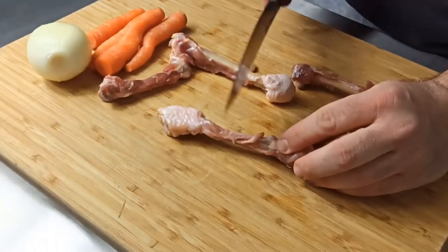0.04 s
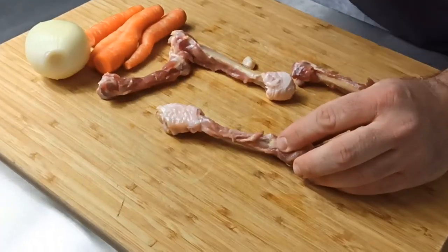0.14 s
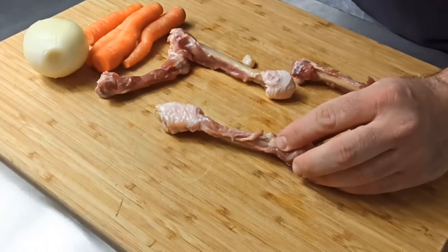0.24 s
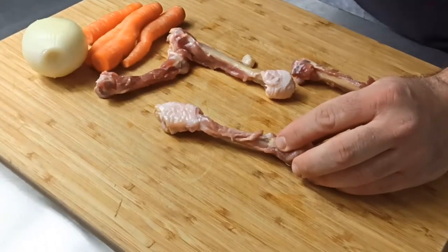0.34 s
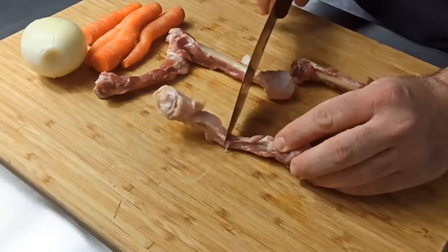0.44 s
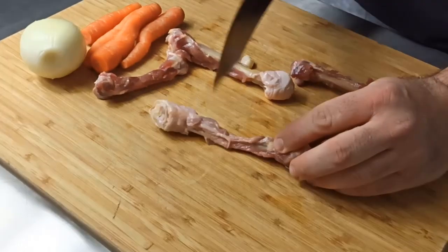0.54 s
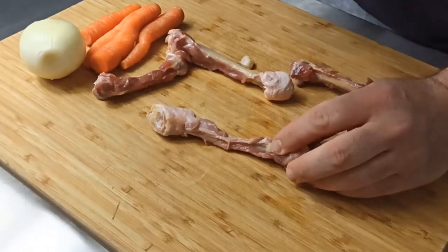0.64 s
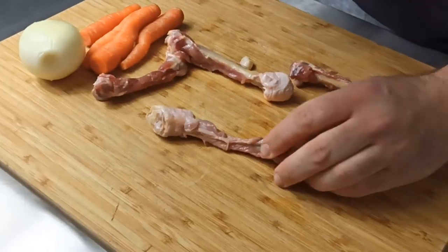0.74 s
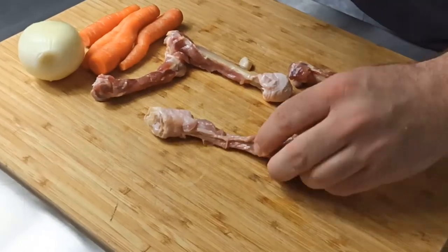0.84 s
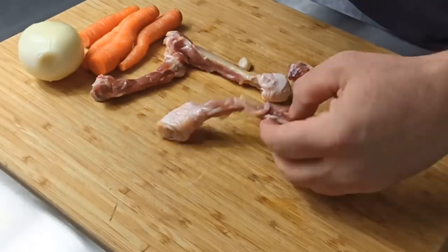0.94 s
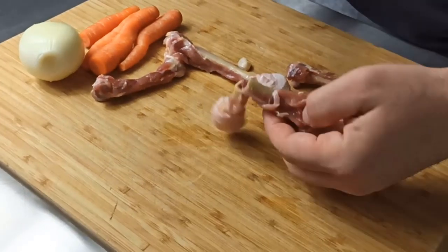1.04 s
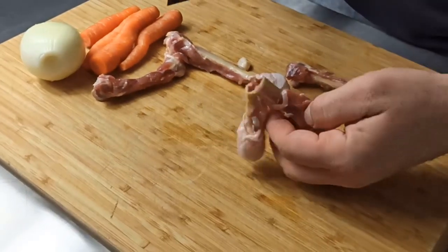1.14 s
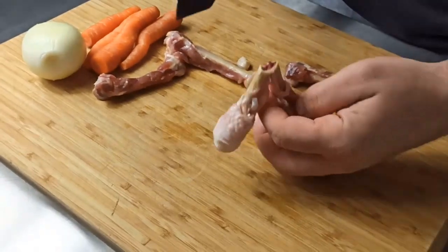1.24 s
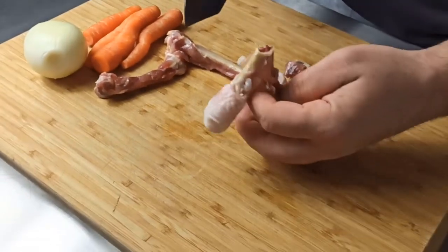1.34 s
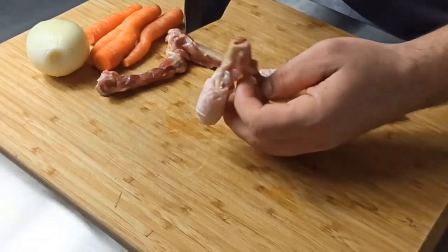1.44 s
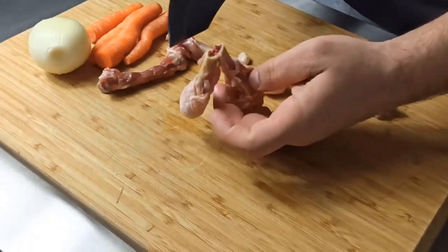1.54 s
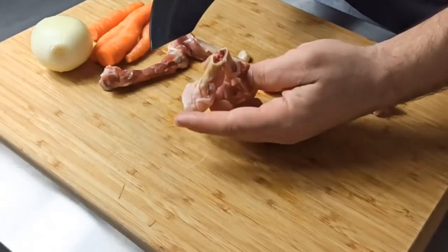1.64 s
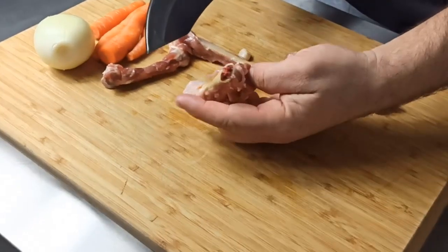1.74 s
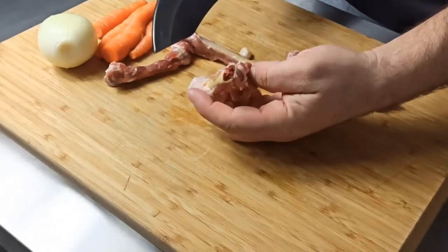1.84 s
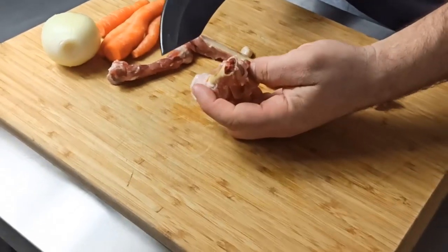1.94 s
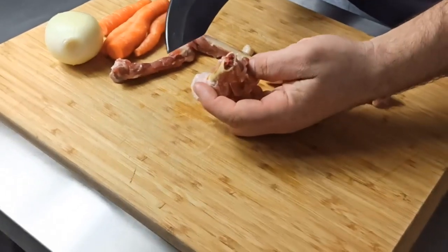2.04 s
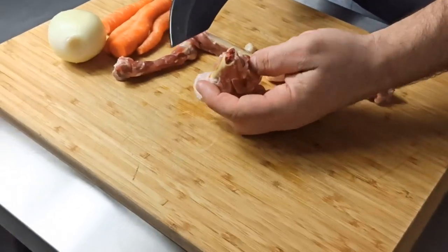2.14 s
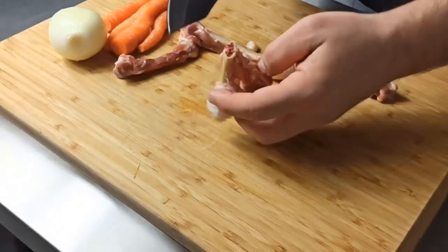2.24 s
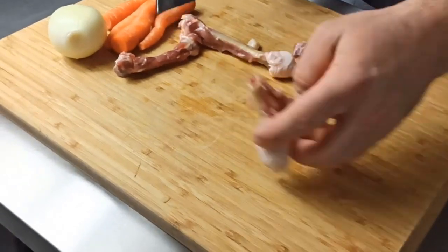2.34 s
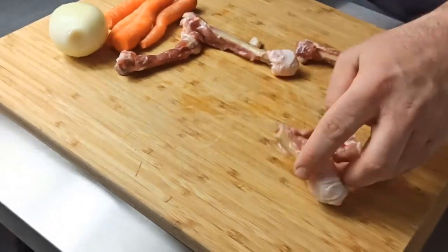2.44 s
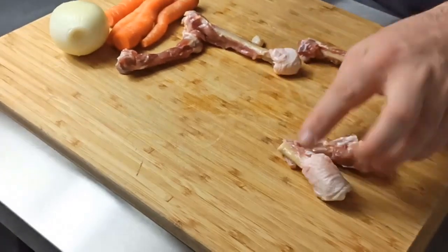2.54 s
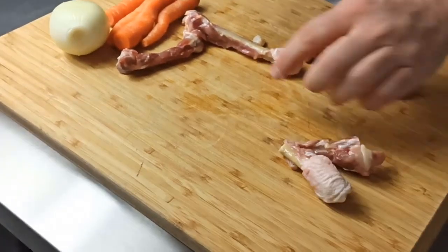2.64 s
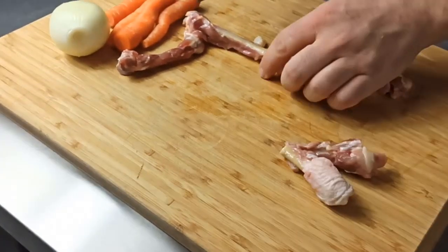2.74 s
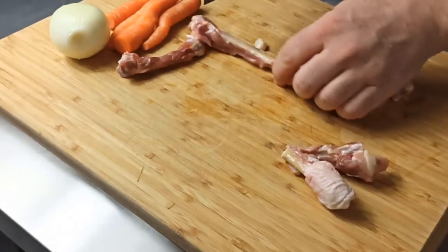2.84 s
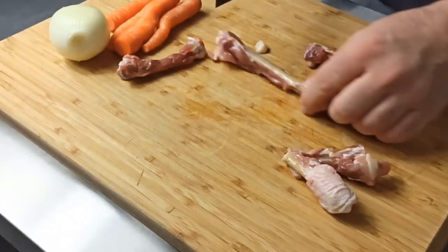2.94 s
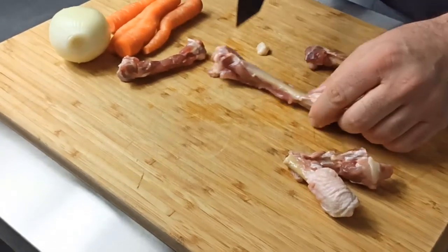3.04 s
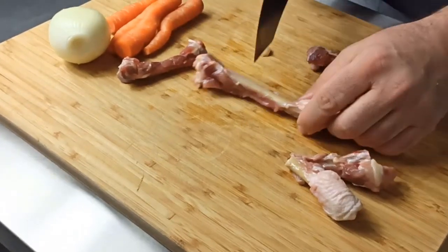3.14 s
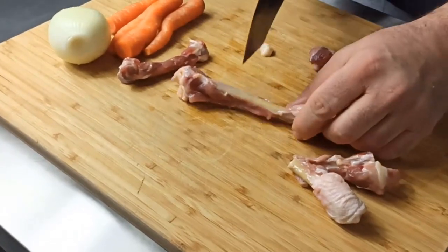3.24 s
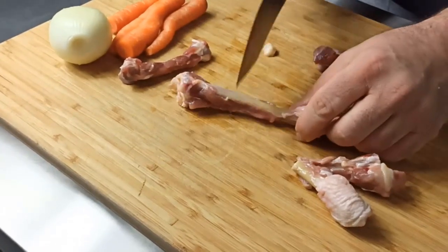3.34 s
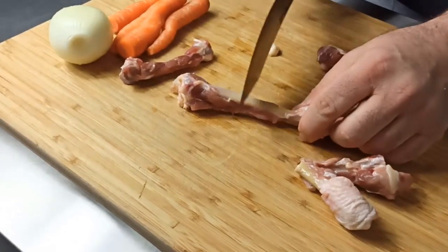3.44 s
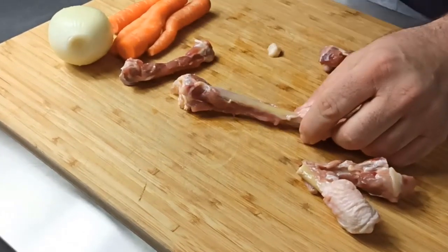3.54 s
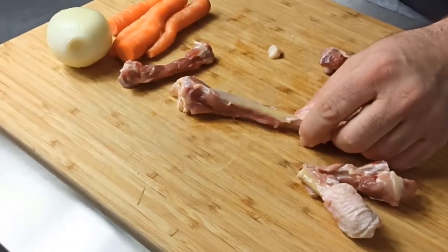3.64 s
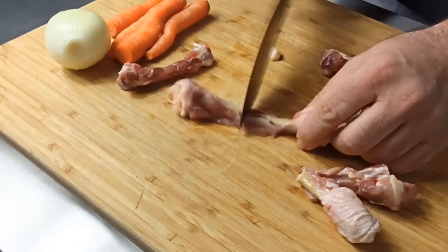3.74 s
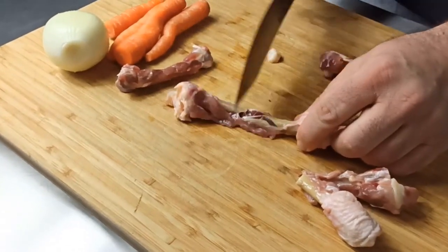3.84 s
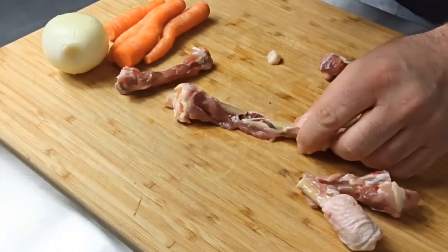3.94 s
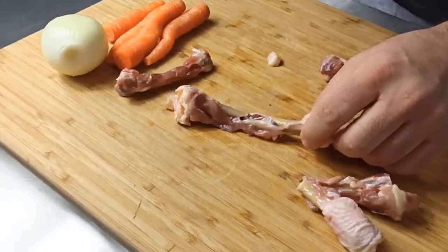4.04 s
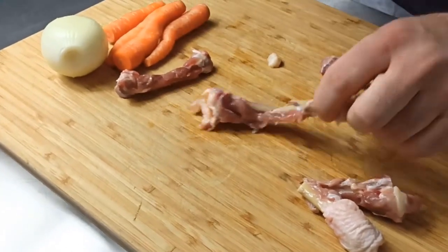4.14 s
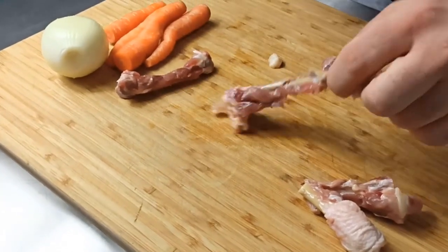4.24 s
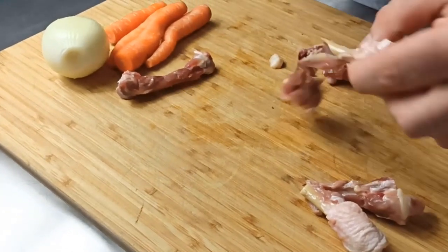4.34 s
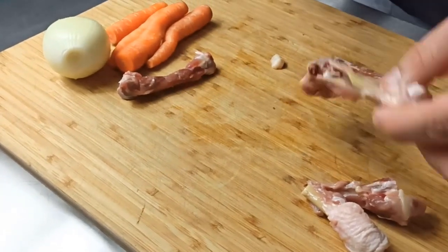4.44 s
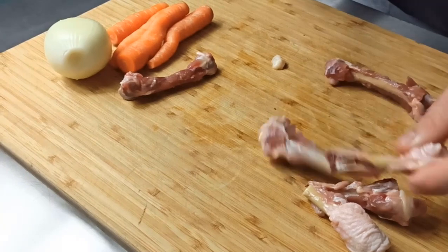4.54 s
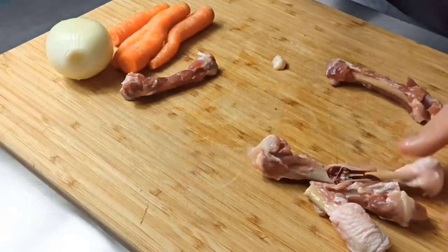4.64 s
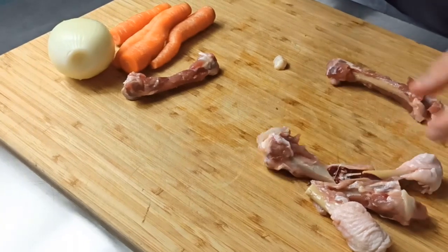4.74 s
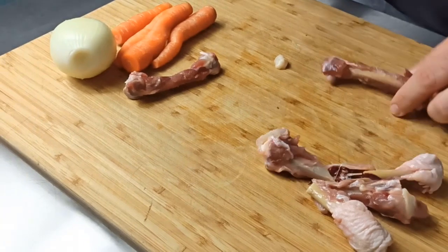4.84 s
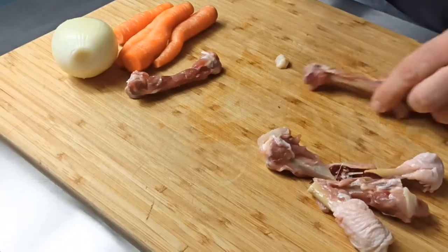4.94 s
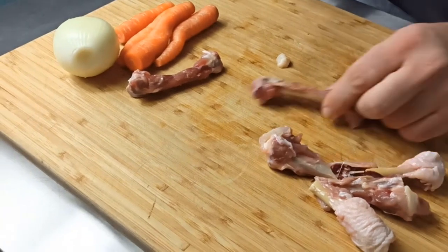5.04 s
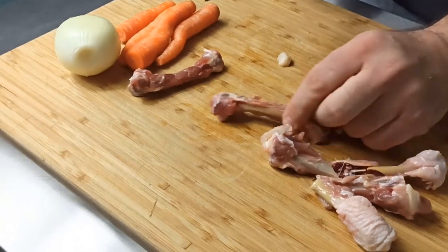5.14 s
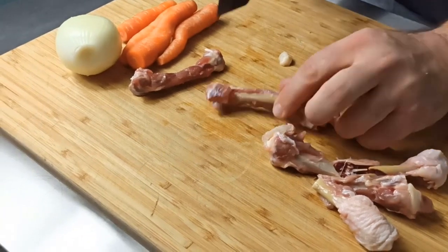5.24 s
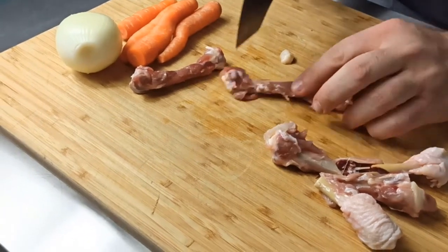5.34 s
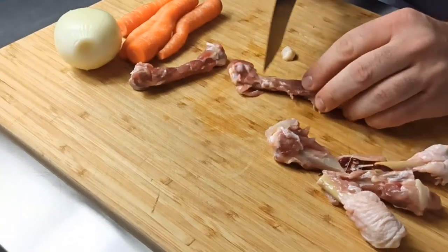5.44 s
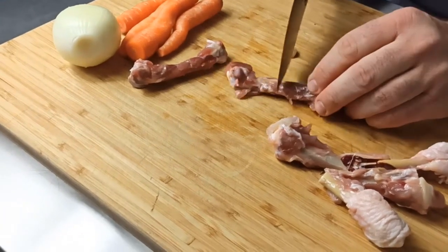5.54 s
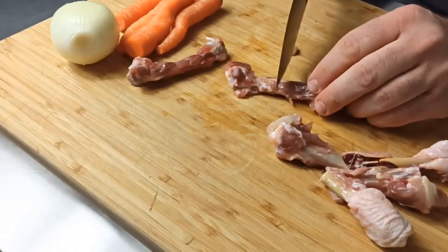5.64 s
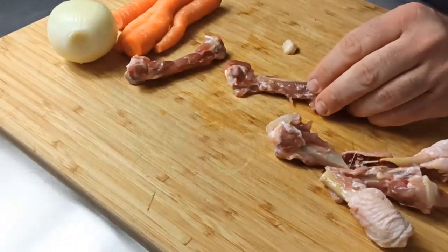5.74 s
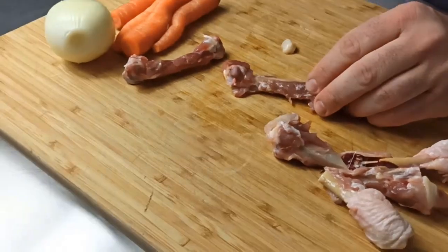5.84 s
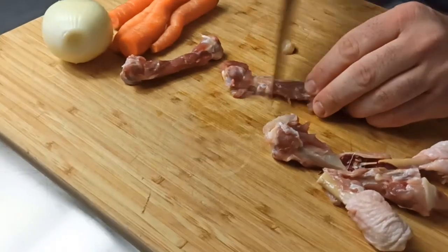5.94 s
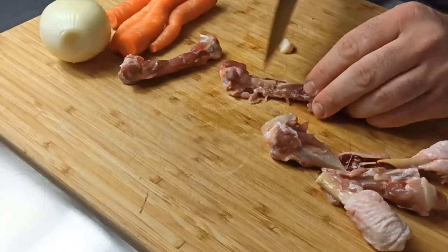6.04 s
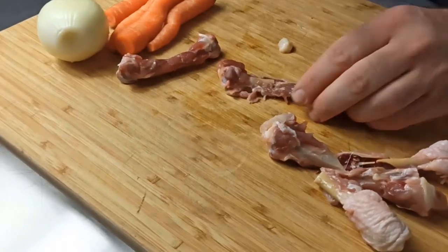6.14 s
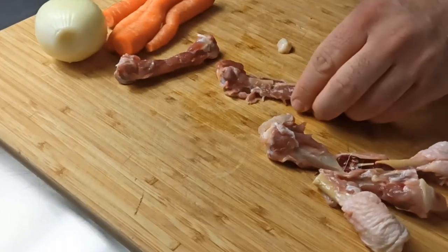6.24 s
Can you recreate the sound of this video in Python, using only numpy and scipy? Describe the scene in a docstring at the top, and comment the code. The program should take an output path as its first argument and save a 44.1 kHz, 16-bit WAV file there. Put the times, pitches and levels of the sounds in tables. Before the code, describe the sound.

Close stereo sound in a small, hard-walled kitchen: a hard knife blow lands immediately, then a long, splintering bone chop with a faint steel ring. Wet gristle snaps as the bone is twisted, a piece clacks onto the wood, then two more crunching chops follow, with sliding meat and drops between them. A low air rush runs underneath.

```python
"""A hard knife blow lands at once, then a long splintering chop; more hard and faint blows follow.
Each mixes bursts of noise for breaking bone, a short push for the thud, and fading tones for board and blade.
Between chops, wet joints snap and crackle, meat slides and pieces drop: short bursts and swelling noise.
The room is a fading noise tail, over a low steady rush of air.
A limiter squashes the hard chops, so that the room swells up behind them."""
import sys
import numpy as np
from scipy import signal
from scipy.fft import rfft, irfft, next_fast_len
from scipy.io import wavfile
from scipy.ndimage import uniform_filter1d

SR = 44100
rng = np.random.default_rng(int(sys.argv[2]) if len(sys.argv) > 2 else 0)


def generate_wav(signal):
    """Clip the signal to [-1, 1] and save it as 16-bit WAV at the path in sys.argv[1]."""
    frames = np.transpose(np.atleast_2d(signal))
    scaled = np.clip(frames, -1, 1) * 32767
    pcm = np.round(scaled).astype(np.int16)
    wavfile.write(sys.argv[1], SR, pcm)


N = 277830

# All levels are those of the layers before the final mix, the room and the limiter.
# knife blows: start_s, thud_db, thud_pitch_hz, crack_db, crack_pitch_hz, splintering_s, blade_db, puff_db
CHOPS = [(.043, -7, 200, -11, 7350, .0011, -60, -28), (0.4917, -5, 210, 9.5, 4300, 0.012, -33.5, -24),
         (3.4731, -37, 234, -12.5, 4606, 0.00078, -72, -68), (3.829, -7, 182, 6.5, 4430, .0055, -58, -15),
         (5.6438, -39.5, 138, -41, 4400, .0022, -85.5, -49),
         (6.0336, -7, 182.6, 7.5, 4330, 0.00733, -59, -14)]
# bones and knuckles meeting the board: start_s, thud_db, thud_pitch_hz, clack_db, smack_db
DROPS = [(2.563, -54, 200, -30, -54), (2.5786, -45, 204, -24, -35), (2.816, -54, 200, -50.5, -53.5),
         (4.622, -37, 161, -38.5, -43.5), (4.657, -40, 163, -43, -44.5), (5.416, -40.5, 225, -49, -63),
         (5.469, -45.5, 213.6, -52, -75.5)]
# the loudest snaps of gristle and wet skin: start_s, level_db (SNAP_DB is added)
SNAPS = [(0.9518, -48), (0.9742, -45), (1.0016, -46), (1.071, -43), (1.167, -47), (2.333, -49.5),
         (4.103, -41.5), (4.392, -43), (4.6785, -33), (4.7344, -36), (5.001, -44.5)]
# meat sliding under the fingers and over the board: middle_s, half_length_s, crackle_db
SLIDES = [(.38, 0.16, -63), (3.01, .08, -59), (3.24, .07, -63), (4.16, 0.072, -62), (4.363, .075, -63),
          (5.02, 0.094, -60), (5.145, 0.047, -50.5), (5.423, .046, -57)]
# tones of the board on its counter: pitch_hz, relative_level_db, fade_by_60_db_s
BOARD = [(154, -20, 0.17), (158, -19.5, .55), (190, -18.5, 0.7), (203, 11, 0.029), (254, -20.5, 0.78),
         (407, -26, .45), (475, -26.5, 0.87), (486, -26.5, 0.29), (500, -17, .48), (569.7, -17, 0.13),
         (610, 2.5, 0.044), (706, -21, 0.59), (922, -2, 0.072)]
# tones of the steel blade: pitch_hz, relative_level_db, fade_by_60_db_s
BLADE = [(899, 0, .85), (1599, -27, 2.8), (2315, -25, 1.3), (3004, -8, .7), (3564, -9, .75),
         (4048, -12, .8), (4344, -32, 3.4)]
# colour of the push on the board: multiple_of_its_pitch, relative_level_db
THUD = [(.12, -39), (.35, -16), (.65, -4.5), (1, 1.5), (1.6, -11.5), (2.1, -12), (3, -26.5), (6, -29.5),
        (20, -58)]
# colour of bone hammering the wood: pitch_hz, relative_level_db
KNOCK = [(150, -23.5), (330, -12), (460, -2.5), (610, 3.5), (760, -5), (900, -6), (1100, -16), (2000, -35),
         (6000, -58.5)]
# colour of bare bone clacking: pitch_hz, relative_level_db
CLACK = [(200, -23.5), (700, -5.5), (1100, -2.5), (1400, -2.5), (1800, 1.5), (2900, -4), (4000, -6),
         (8000, -24), (16000, -43)]
# colour of splintering bone: pitch_hz, relative_level_db
CRACK = [(500, -31), (2000, -17), (2900, -9.5), (3700, -2.5), (4500, -1), (5500, -2.5), (7400, -0.5),
         (8500, -2), (12000, -12.5), (16000, -8)]
# colour of wet gristle and skin: pitch_hz, relative_level_db
WET = [(500, -21), (2800, -13), (4100, -4), (5500, 4.5), (7200, -0.5), (8500, -0.5), (12000, -8.5),
       (16000, -15)]
# colour of the kitchen's steady air noise: pitch_hz, relative_level_db
AIR = [(20, -26.5), (45, -18.5), (90, -2.5), (200, -1), (320, -5), (600, -12), (950, -12.5), (1500, -19.5),
       (2600, -23.5), (4200, -22), (8000, -25.5), (15000, -28)]
# how long the room rings: pitch_hz, fade_by_60_db_s
ROOM_FADE = [(100, 0.18), (220, 0.8), (400, 0.63), (580, 0.4), (1000, 0.4), (2500, 0.33), (7000, 0.27),
             (14000, 0.17)]
# how loud the room is: pitch_hz, level_over_direct_sound_db
ROOM_LEVEL = [(40, -9), (110, -1), (200, -1), (500, 4), (1500, -3), (3000, -7), (5000, -9), (8000, -6),
              (14000, -5.5)]
# how alike left and right are: pitch_hz, likeness (1 = the same, 0 = unrelated)
ALIKE = [(150, .98), (300, .9), (550, 0.39), (1000, .1), (2000, -.1), (8000, 0.2)]
# the recorder's stepped treble colour: lower_edge_hz, level_db
TREBLE = [(0, 0), (4780, -8), (6120, 0), (7700, -4), (8600, -16), (9100, -42), (11550, -4)]
# a hollow bone's two bending resonances: pitch_hz, width_hz, level_db
BONE = [(1004, 59, -2.5), (1764, 70, 2.5)]
# how clack and knock follow a blow: db_per_thud_db, db_per_crack_db, db_per_doubled_splintering, offset_db
CLACK_LAW, KNOCK_LAW = (0.48, 0.3166, 2.6, -4.5), (0.77, 0.18, 3, -3)
LONG_BREAK_S = 0.01  # splintering time of a full break
EDGE_HZ, EDGE_DB_PER_OCTAVE = 19500, 24  # the crack's upper edge at a thud of 0 dB; lighter blows are duller
HARD_DROP_DB, HARD_DROP_HZ, DROP_DB_PER_OCTAVE = -28.5, 2900, 10.5  # a softer landing clacks lower
SNAP_DB, SNAP_HOLD_S, SNAP_FADE_S = -9, 0.0005, 0.014
# twisting the chopped bone apart tears small fibres at random moments
TWIST_FROM_S, TWIST_TO_S = 0.87, 1.19
FIBRE_DB, FIBRE_SCATTER_DB = -53.5, 2
# the board's rumble at a firm stroke; it grows faster than the crackle
FIRM_SLIDE_DB, RUMBLE_DB, RUMBLE_GROWS = -51.5, -53.5, 1.5
TOP_HZ = 15900  # the final upper band limit


def chops(bone_width_hz=240, bone_db=5, board_db=-12):
    """The edge splinters the bone, drives into the board and leaves the blade ringing."""
    out = np.zeros((2, N))
    bending = lambda f: 1 + sum(amp(db) * resonance(f, hz, width) for hz, width, db in BONE)
    for start_s, thud_db, thud_hz, crack_db, crack_hz, hold_s, blade_db, _ in CHOPS:
        clack_db = fed_by(CLACK_LAW, thud_db, crack_db, hold_s)
        knock_db = fed_by(KNOCK_LAW, thud_db, crack_db, hold_s)
        top_hz = EDGE_HZ * 2 ** (thud_db / EDGE_DB_PER_OCTAVE)
        # the splintering rings the bone shaft at one pitch; a longer break also dies more slowly
        shaft = lambda f: 1 + amp(bone_db) * resonance(f, crack_hz, bone_width_hz)
        splinters = coloured(burst(hold_s, fade_s=0.02 + 3.1 * hold_s), CRACK)
        crack = unit_hit(duller(filtered(splinters, shaft), top_hz))
        clack = unit_hit(filtered(coloured(burst(hold_s, fade_s=0.11), CLACK), bending))
        # the crushed bone hammers the wood unevenly for as long as it breaks
        knock = unit_hit(coloured(burst(hold_s, fade_s=0.032), KNOCK))
        breaking = amp(crack_db) * crack + amp(clack_db) * clack + amp(knock_db) * knock
        add(out, start_s, in_kitchen(breaking))
        # the board takes the full blow halfway through the splintering
        through_s = start_s + hold_s / 2
        add(out, through_s, in_kitchen(amp(thud_db) * push(thud_hz)))
        add(out, through_s, amp(thud_db + board_db) * ring(BOARD, SR * 3 // 4))
        add(out, through_s, amp(blade_db) * ring(BLADE, SR * 3 // 2))
    return out


def blade_wind():
    """The broad blade shoves a puff of air ahead of each blow; it reaches the left microphone first."""
    out = np.zeros((2, N))
    width_s = 0.0033
    leads_s = np.array([[0.003], [0.001]])  # left, right
    for start_s, *_, puff_db in CHOPS:
        u = (np.arange(N) / SR - start_s + leads_s) / width_s
        # pressure first, then suction
        out += amp(puff_db) * -u * np.exp(-u * u / 2)
    return out


def drops(bone_width_hz=900, bone_db=3, board_db=-10, soft_hz=300, knock_db=-12):
    """Pieces land with a thud cushioned by meat, a clack of bare bone and a smack of skin."""
    out = np.zeros((2, N))
    for start_s, thud_db, thud_hz, clack_db, smack_db in DROPS:
        softer_db = min(clack_db - HARD_DROP_DB, 0)
        clack_hz = HARD_DROP_HZ * 2 ** (softer_db / DROP_DB_PER_OCTAVE)
        shaft = lambda f: 1 + amp(bone_db) * resonance(f, clack_hz, bone_width_hz)
        bare_bone = filtered(coloured(burst(hold_s=0.0003, fade_s=0.059), CLACK), shaft)
        clack = unit_hit(duller(bare_bone, 2 * clack_hz))
        smack = unit_hit(duller(coloured(burst(hold_s=0.00083, fade_s=0.03), WET), 5600))
        # the piece settles for a moment, knocking lightly on the wood
        knock = unit_hit(coloured(burst(hold_s=0.0037, fade_s=0.028), KNOCK))
        thud = unit_hit(duller(push(thud_hz), soft_hz)) + amp(knock_db) * knock
        landing = amp(thud_db) * thud + amp(clack_db) * clack + amp(smack_db) * smack
        add(out, start_s, in_kitchen(landing))
        add(out, start_s, amp(thud_db + board_db) * duller(ring(BOARD, SR // 2), soft_hz))
    # a little right of the chops
    return out * amp([[-0.7], [0.7]])


def wet_meat(uneven_db=4.5, snap_hz=3800):
    """Gristle snaps in thin ticks; sliding skin crackles finely and a dragged bone rumbles on the wood."""
    out, t = np.zeros((2, N)), np.arange(N) / SR
    thin = lambda f: resonance(f, snap_hz, snap_hz)
    for start_s, db in list(SNAPS) + torn_fibres():
        tick = filtered(coloured(burst(SNAP_HOLD_S, SNAP_FADE_S), WET), thin)
        add(out, start_s, amp(db + SNAP_DB) * unit_hit(duller(tick, 16000)))
    # each stroke swells and fades smoothly around its middle
    strokes = sum(amp(db) * np.exp(-((t - middle_s) / half_s) ** 2) for middle_s, half_s, db in SLIDES)
    # the skin sticks unevenly: a new random level about 600 times a second
    steps = t[::SR // 600]
    sticky_db = uneven_db * np.interp(t, steps, rng.standard_normal(len(steps)))
    crackle = unit(filtered(noise_pair(N) * amp(sticky_db), lambda f: amp(along(WET, f))))
    rumble = unit(signal.fftconvolve(noise_pair(N), push(pitch_hz=183), axes=1)[:, :N])
    firmness = (strokes / amp(FIRM_SLIDE_DB)) ** RUMBLE_GROWS
    out += strokes * crackle + amp(RUMBLE_DB) * firmness * rumble
    return in_kitchen(out)[:, :N]


def torn_fibres(count=24):
    """Tearing fibres give small snaps at chance moments of the twist: start_s, level_db."""
    times = rng.uniform(TWIST_FROM_S, TWIST_TO_S, count)
    levels_db = FIBRE_DB + FIBRE_SCATTER_DB * rng.standard_normal(count)
    return list(zip(times, levels_db))


def in_kitchen(x, gap_s=0.0064):
    """Bare walls add a fresh noise tail to the direct sound; each pitch range fades at its own speed."""
    hz, t, z = signal.stft(noise_pair(SR * 3 // 4), SR, nperseg=256)
    fade_s = along(ROOM_FADE, hz)[:, None]
    # a long tail starts lower, so that ROOM_LEVEL sets its whole energy
    gain = amp(along(ROOM_LEVEL, hz))[:, None] * np.sqrt(2 * np.log(1000) / (fade_s * SR))
    tail = signal.istft(z * gain * amp(-60 * t / fade_s), SR, nperseg=256)[1]
    # the echoes build up over the first few milliseconds
    tail *= 1 - np.exp(-(np.arange(tail.shape[1]) / SR / gap_s) ** 2)
    tail[:, 0] += 1  # the direct sound
    return signal.fftconvolve(x, tail, axes=1)


def room_air(air_db=-58.0):
    """Ventilation makes a low, steady rush: noise coloured towards the bass."""
    return amp(air_db) * unit(filtered(noise_pair(N), lambda f: amp(along(AIR, f))))


def fed_by(law, thud_db, crack_db, hold_s):
    """Level in dB of a layer fed partly by the blow on the board and partly by the breaking bone."""
    per_thud, per_crack, db_per_doubling, offset_db = law
    length_db = db_per_doubling * np.log2(hold_s / LONG_BREAK_S)
    return per_thud * thud_db + per_crack * crack_db + length_db + offset_db


def burst(hold_s, fade_s):
    """Tiny fractures of uneven size build up over the hold time and then die away."""
    t = np.arange(SR // 8) / SR
    step = SR // 2000  # a new size every half millisecond
    sizes_db = 4 * np.repeat(rng.standard_normal(len(t) // step + 1), step)[:len(t)]
    fade = amp(-60 * np.maximum(t - hold_s, 0) / fade_s)
    build_up = 1 - np.exp(-3 * t / max(hold_s, 1e-4))
    return noise_pair(len(t)) * amp(sizes_db) * fade * build_up


def push(pitch_hz):
    """One clean push on the wood, the same in both channels."""
    spectrum = [(multiple * pitch_hz, db) for multiple, db in THUD]
    return unit_hit(coloured(signal.unit_impulse(SR // 8), spectrum)) * np.ones((2, 1))


def ring(modes, length):
    """A struck body rings in fading tones, at slightly new strengths every time."""
    t = np.arange(length) / SR
    out = np.zeros(length)
    for hz, db, fade_s in modes:
        level_db = db + rng.standard_normal() - 60 * t / fade_s
        out += amp(level_db) * np.sin(2 * np.pi * hz * t)
    return out


def noise_pair(n):
    """White noise at two spaced microphones: alike in the bass, nearly unrelated in the treble."""
    turn = lambda f: np.arccos(np.clip(along(ALIKE, f), -1, 1)) / 2
    shares = lambda f: np.array([np.cos(turn(f)), np.sin(turn(f))])
    mid, side = filtered(rng.standard_normal((2, n)), shares)
    return np.array([mid + side, mid - side])


def resonance(f, hz, width_hz):
    """A body that favours one pitch: the response is 1 at its centre."""
    return 1j * f * width_hz / (hz * hz - f * f + 1j * f * width_hz)


def duller(x, top_hz):
    """Soft contact takes off the treble above top_hz."""
    return filtered(x, lambda f: 1 / (1 + 1j * np.sqrt(2) * f / top_hz - (f / top_hz) ** 2))


def coloured(x, spectrum):
    """Colour a contact so that nothing sounds before it."""
    n = x.shape[-1]
    log_gain = np.log(amp(along(spectrum, np.fft.rfftfreq(n, 1 / SR))))
    # folding the cepstrum forward in time gives the minimum-phase filter
    cepstrum = irfft(log_gain, n)
    cepstrum[1:n // 2] *= 2
    cepstrum[n // 2 + 1:] = 0
    return irfft(rfft(x) * np.exp(rfft(cepstrum)), n)


def filtered(x, response):
    """Multiply the spectrum of x by a response that depends on frequency."""
    n = x.shape[-1]
    m = next_fast_len(n + SR // 8)  # spare room for the filter's ringing
    return irfft(rfft(x, m) * response(np.fft.rfftfreq(m, 1 / SR)), m)[..., :n]


def along(points, hz):
    """Read a value between (Hz, value) points on a log pitch axis."""
    f, v = np.transpose(points)
    return np.interp(np.log(hz + 1), np.log(f), v)


def amp(db):
    """Turn decibels into gain."""
    return 10 ** (np.asarray(db) / 20)


def unit(x):
    """Scale to rms 1."""
    return x / np.sqrt(np.mean(x ** 2) + 1e-20)


def unit_hit(x):
    """Scale a hit to the energy of a hundredth of a second at rms 1."""
    return unit(x) * np.sqrt(SR / 100 / x.shape[-1])


def add(track, start_s, sound):
    """Mix a sound into the track at its start time."""
    start = max(round(start_s * SR), 0)
    part = sound[..., :max(N - start, 0)]
    track[:, start:start + part.shape[-1]] += part


def scene():
    """The work on the board, a little right of centre, over the kitchen's air."""
    work = chops() + blade_wind() + drops() + wet_meat()
    return work * amp([[-0.4], [0.4]]) + room_air()


def record(dry, ceiling_db=-7, release_db_per_s=135, low_cut_hz=42):
    """A low cut, stepped treble colour, a fast limiter, clipped peaks and the band limit."""
    edges, steps_db = np.transpose(TREBLE)
    hz = np.linspace(0, SR / 2, 1025)
    step = np.searchsorted(edges, hz, "right") - 1
    tone = signal.firwin2(1801, hz, amp(steps_db[step]), fs=SR)
    low_cut = signal.butter(2, low_cut_hz, "highpass", fs=SR, output="sos")
    x = signal.sosfilt(low_cut, dry)
    x = signal.fftconvolve(x, tone[None], "same", axes=1)
    # the limiter watches the power of both channels over about 5 ms
    power = np.abs(uniform_filter1d(np.mean(x ** 2, 0), size=220))
    over_db = np.maximum(10 * np.log10(power + 1e-12) - ceiling_db, 0)
    # the gain drops at once and comes back at a steady rate, then is smoothed slightly
    ramp = release_db_per_s * np.arange(N) / SR
    cut_db = np.maximum.accumulate(over_db + ramp) - ramp
    x = x * amp(-uniform_filter1d(cut_db, size=64))
    # peaks round off towards 1
    x = x / (1 + x ** 8) ** (1 / 8)
    band_limit = signal.firwin(301, TOP_HZ, fs=SR)
    return signal.fftconvolve(x, band_limit[None], "same", axes=1)


dry = scene()
out = record(dry)
generate_wav(out)
```